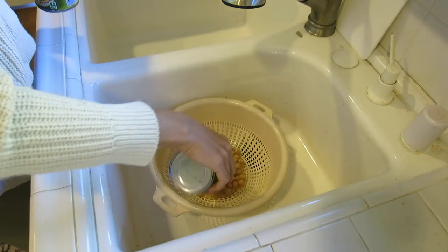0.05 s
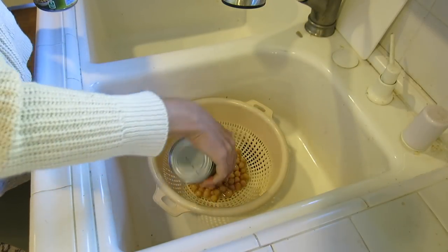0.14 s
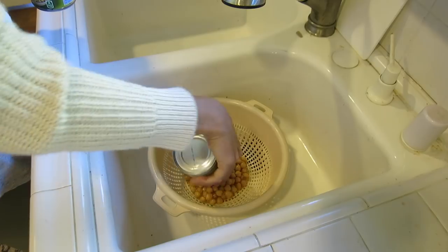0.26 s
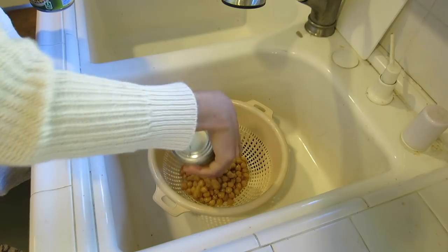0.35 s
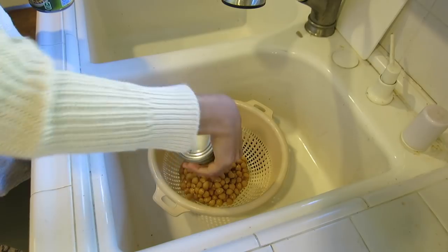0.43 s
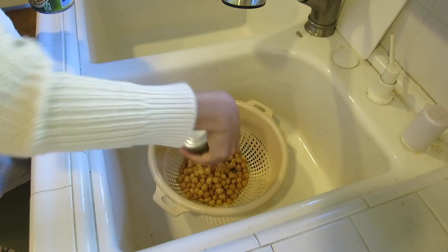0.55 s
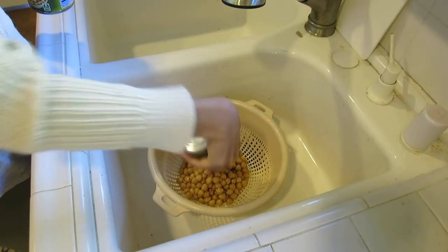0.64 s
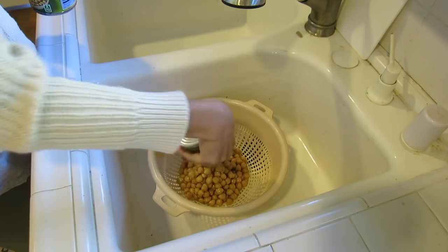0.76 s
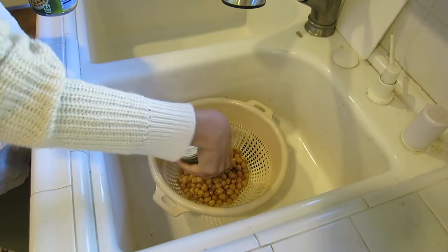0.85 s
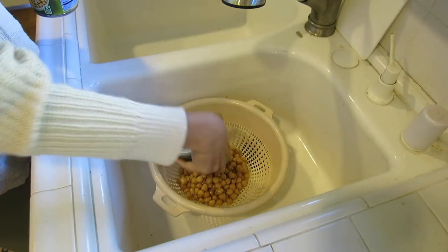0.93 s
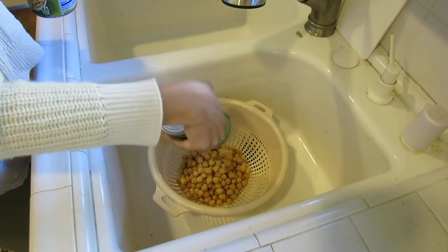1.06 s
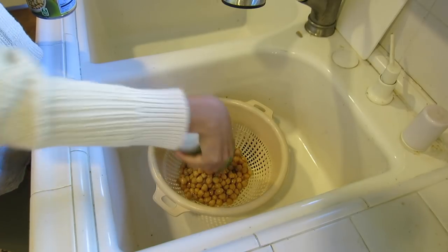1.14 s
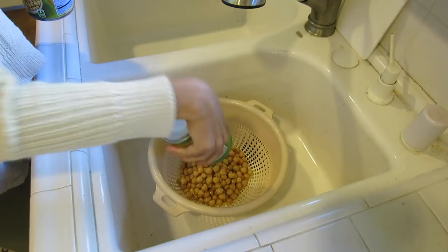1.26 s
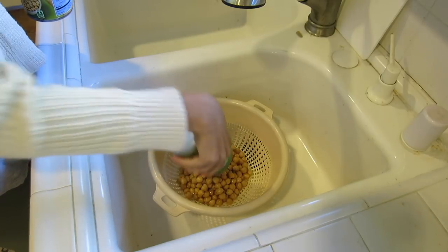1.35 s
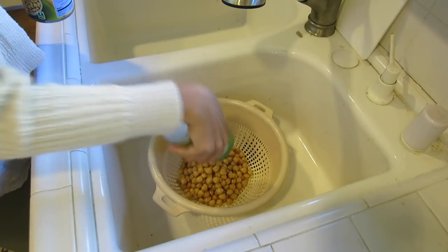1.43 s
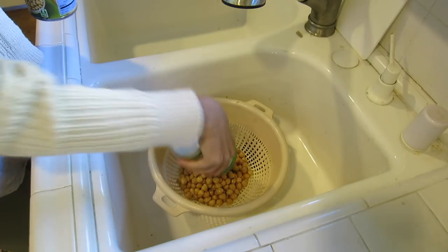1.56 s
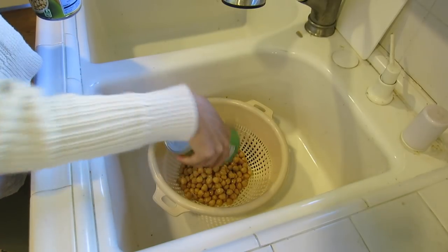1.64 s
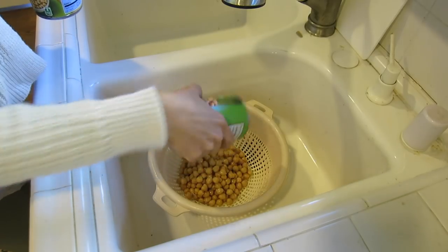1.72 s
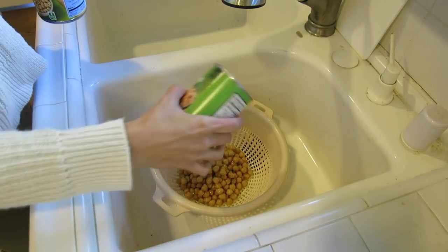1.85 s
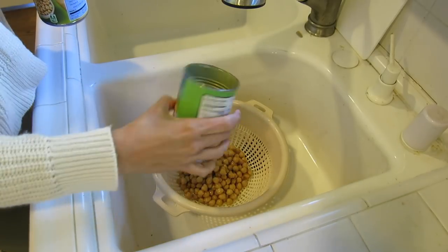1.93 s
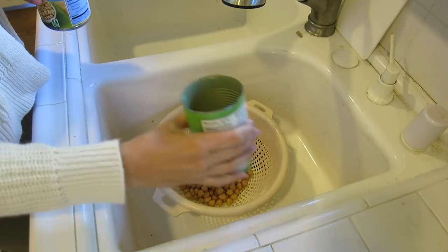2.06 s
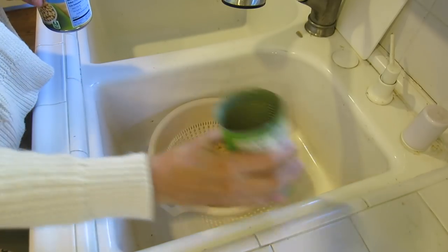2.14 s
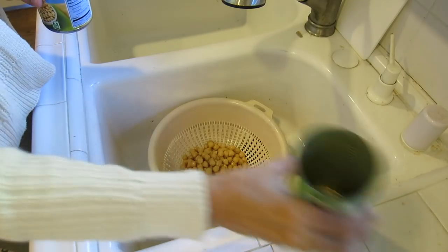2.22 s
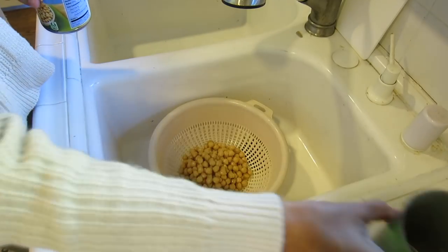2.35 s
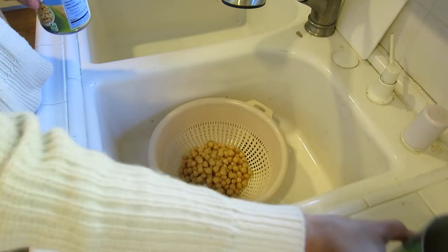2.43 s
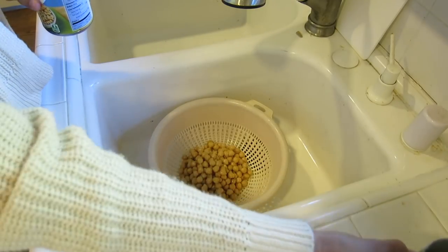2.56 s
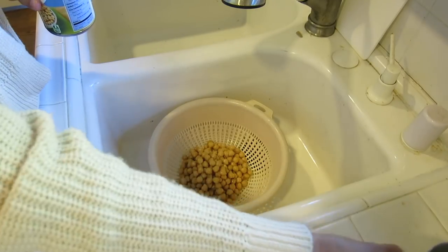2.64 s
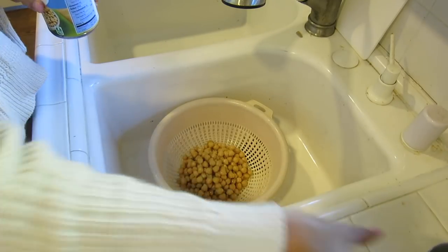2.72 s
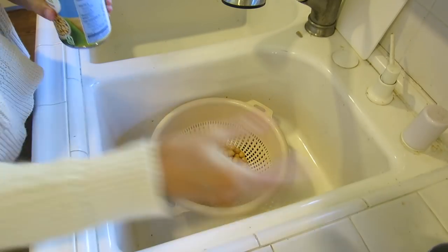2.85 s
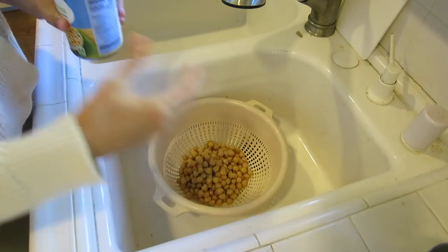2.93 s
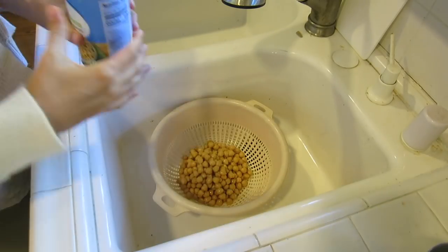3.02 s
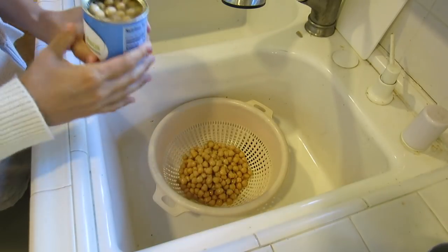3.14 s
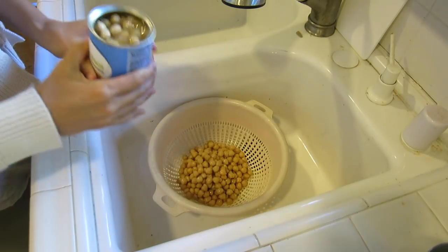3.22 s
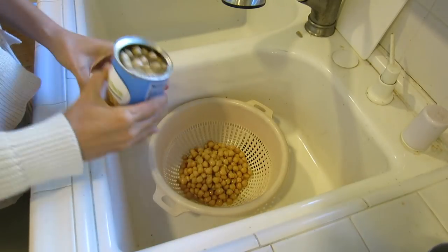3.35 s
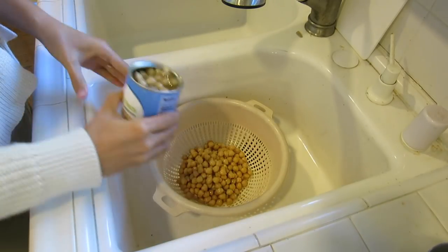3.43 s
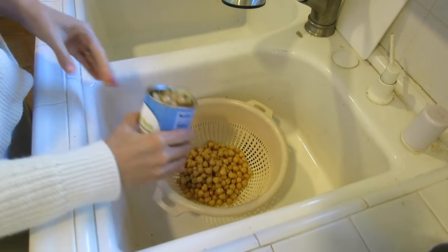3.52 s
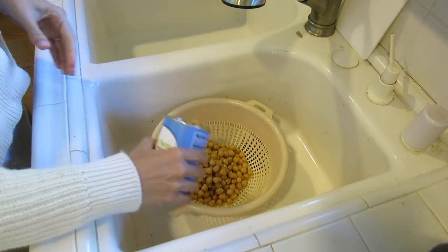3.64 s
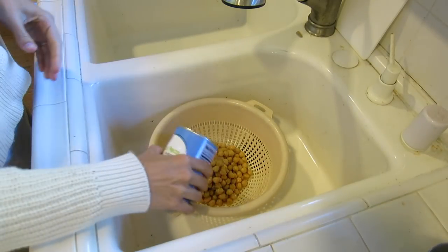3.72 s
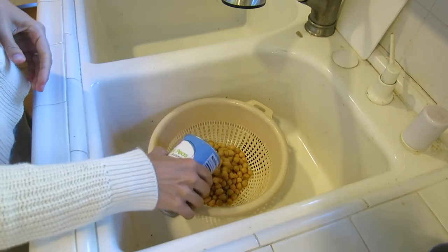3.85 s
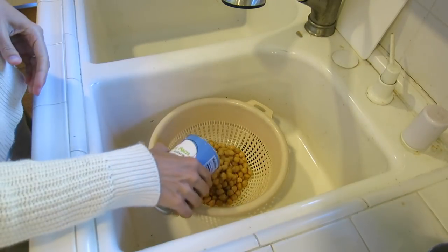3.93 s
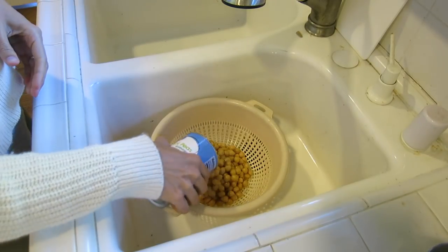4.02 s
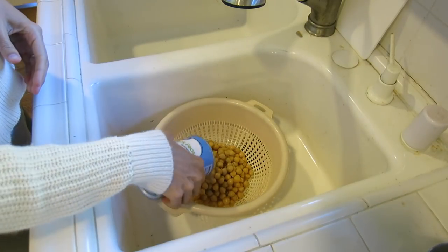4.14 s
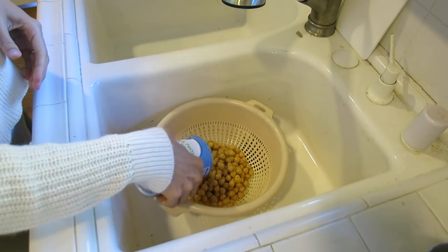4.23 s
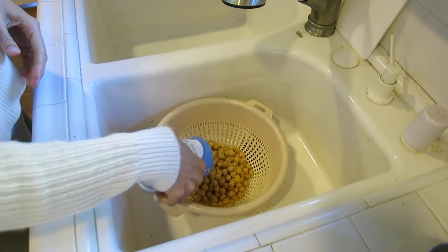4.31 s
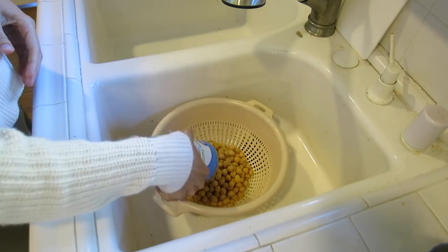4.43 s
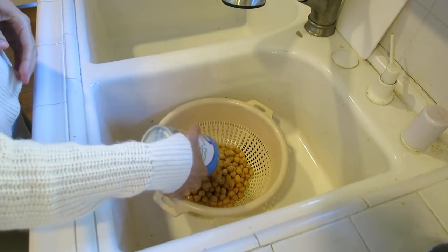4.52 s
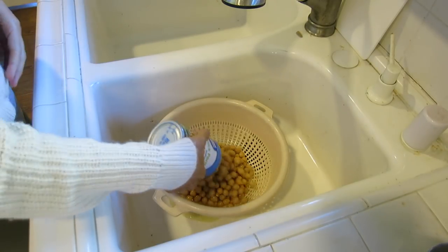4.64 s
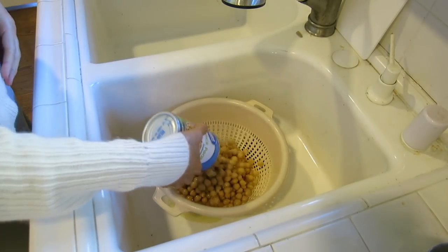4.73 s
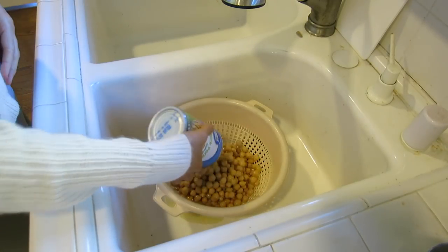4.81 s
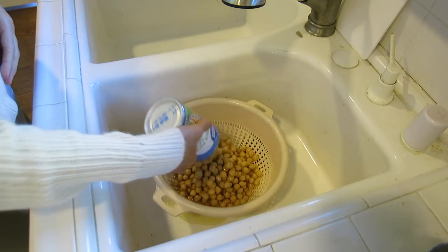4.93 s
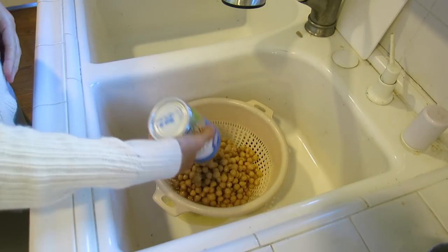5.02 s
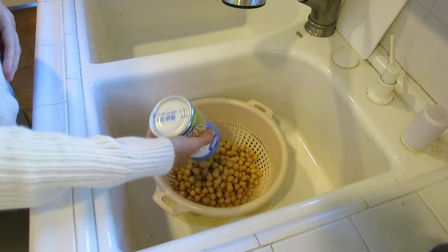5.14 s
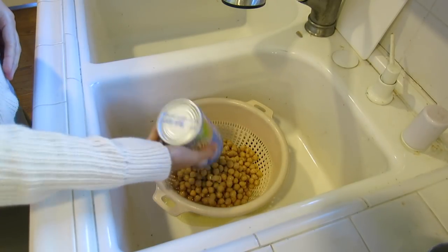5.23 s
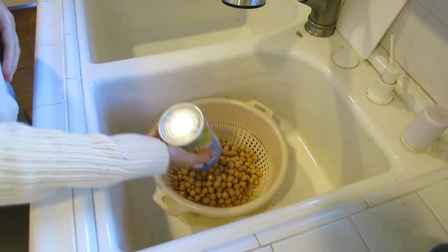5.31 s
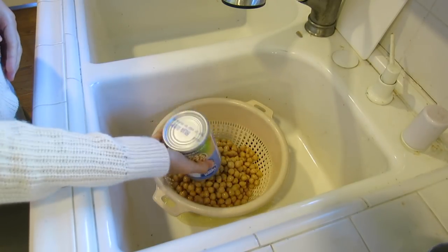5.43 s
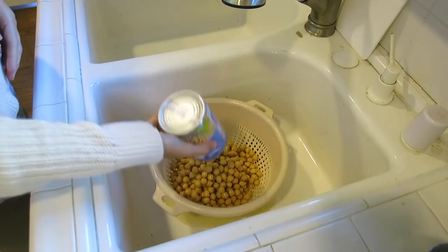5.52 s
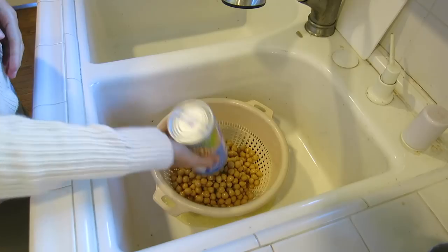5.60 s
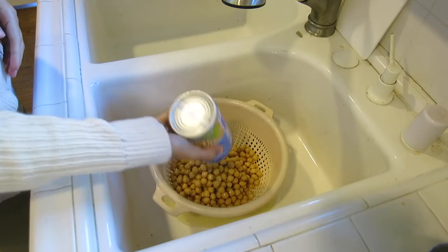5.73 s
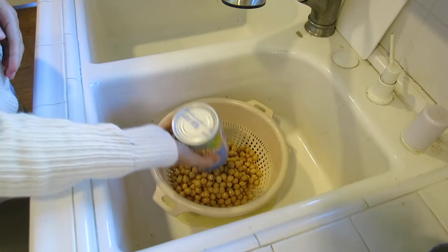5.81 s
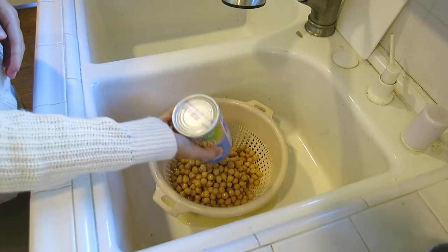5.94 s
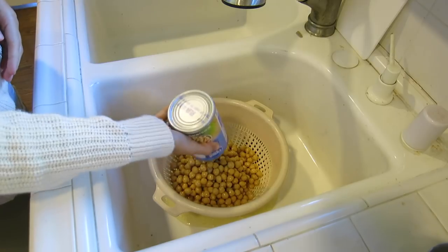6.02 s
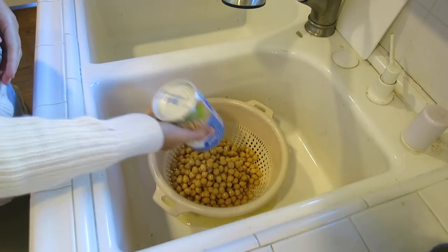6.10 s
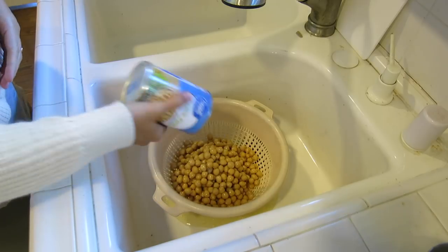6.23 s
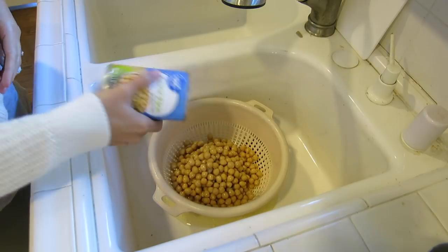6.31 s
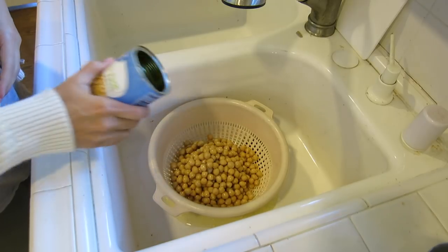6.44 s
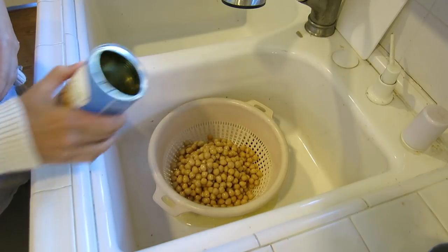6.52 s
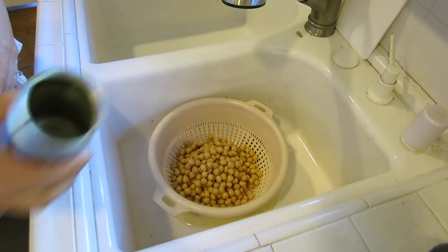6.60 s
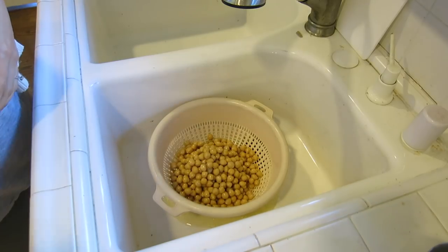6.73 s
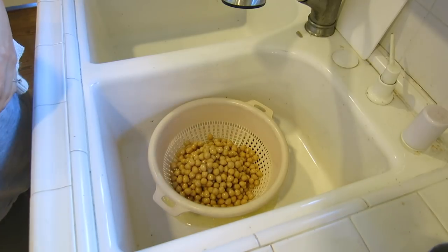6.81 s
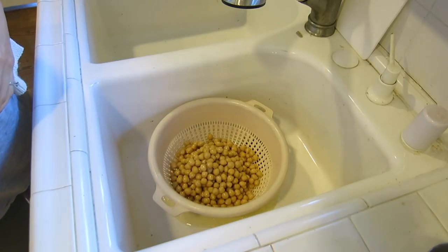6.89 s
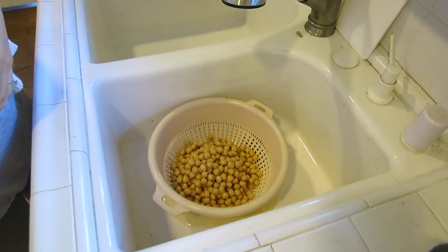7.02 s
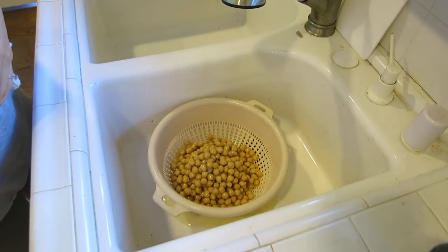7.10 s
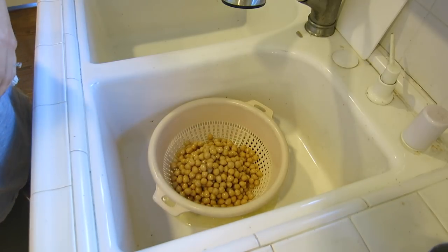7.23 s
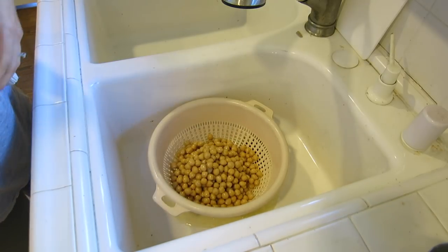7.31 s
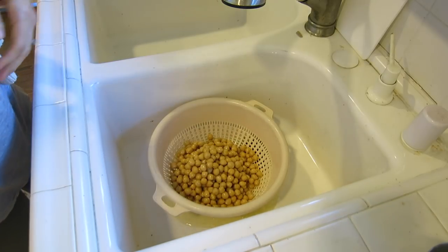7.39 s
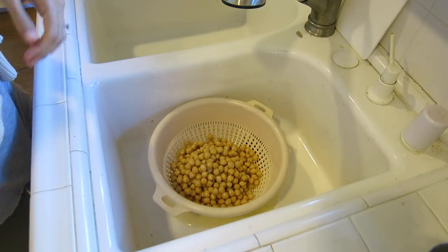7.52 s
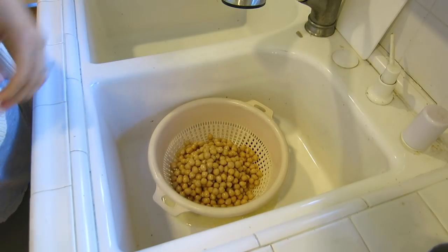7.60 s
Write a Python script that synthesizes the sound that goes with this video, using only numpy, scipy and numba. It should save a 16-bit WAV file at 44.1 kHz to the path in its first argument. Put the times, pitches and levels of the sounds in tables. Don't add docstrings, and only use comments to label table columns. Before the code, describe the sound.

Wet chickpeas slide from two tins into a plastic colander in a sink, brine spattering, and each empty can clanks down on tile.

```python
import sys
import numpy as np
from scipy import signal
from scipy.fft import rfft, irfft, next_fast_len
from scipy.io import wavfile
from scipy.ndimage import uniform_filter1d
from numba import njit

SR = 44100
rng = np.random.default_rng(int(sys.argv[2]) if len(sys.argv) > 2 else 0)


def to_wav(s):
    ch = np.atleast_2d(s).T
    pcm = np.round(np.clip(ch, -1, 1) * 32767)
    wavfile.write(sys.argv[1], SR, pcm.astype(np.int16))


def natural_amplitude(level_db):
    exponent = np.asarray(level_db, float) / 20
    return 10 ** exponent


N = 337806
TIME = np.arange(N) / SR


def level(x, db):
    return x * natural_amplitude(db) / np.sqrt(np.mean(x ** 2))


def colour(x, table):
    table = np.asarray(table)
    size = next_fast_len(x.shape[-1] + 4096)
    log_hz = np.log(np.maximum(np.arange(size // 2 + 1) * SR / size, 1))
    gain = 10 ** (np.interp(log_hz, np.log(table[:, 0].real), table[:, 1]) / 20)
    return irfft(rfft(x, size) * gain, size)[..., :x.shape[-1]]


def walk(rate_hz):
    k = int(SR / rate_hz)
    held = np.repeat(rng.standard_normal(N // k + 1), k)
    return 1.3 * uniform_filter1d(uniform_filter1d(held, k), k)[:N]


@njit
def rings(start_s, size, hz, t60_s, glide, rise_cycles):
    out = np.zeros(N)
    for k in range(len(start_s)):
        first = int(start_s[k] * SR)
        z = size[k] + 0j
        p = np.exp((2j * np.pi * hz[k] - np.log(1000) / t60_s[k]) / SR)
        turn = np.exp(2j * np.pi * hz[k] * glide / (t60_s[k] * SR * SR))
        closed, opening = 1., np.exp(-hz[k] / (rise_cycles * SR))
        for i in range(first, min(N, first + int(t60_s[k] * SR))):
            z, p, closed = z * p, p * turn, closed * opening
            out[i] += z.imag * (1 - closed) ** 2
    return out


def bubbles(s, db, hz, cycles, glide, rise=0.19):
    hz = np.minimum(hz, .4 * SR)
    t60_s = 3 * np.maximum(cycles, .5) / hz
    return rings(1. * s, natural_amplitude(db), hz, t60_s, glide, max(rise, .05))


def shower(db, count, scatter_db, low_hz, high_hz, cycles):
    when, pitch, big = rng.random((count, 3)).T
    size_db = -scatter_db * np.log(np.maximum(big, .02))
    hz = low_hz * (high_hz / low_hz) ** pitch
    grains = bubbles(when * TIME[-1], size_db, hz, cycles + 0 * when, glide=0.32)
    return level(grains, 0) * natural_amplitude(db)


def swells(s, db, hold_s, rise_db_s, fall_db_s):
    t = TIME[::64]
    s, db, hold_s = np.array([s, db, hold_s])[:, :, None]
    rise_db = rise_db_s * np.maximum(s - t, 0)
    fall_db = fall_db_s * np.maximum(t - s - hold_s, 0)
    power = np.sum(natural_amplitude(2 * (db - rise_db - fall_db)), axis=0)
    return np.interp(TIME, t, 10 * np.log10(power + 1e-15))


# [peak_s, peas_db, brine_db]
POUR_SURGES = [(0, -47.5, -39), (0.135, -49, -40.5), (0.401, -45.5, -46.5), (.47, -52.5, -55.5),
               (0.801, -47, -58), (.97, -52, -56.5), (3.36, -67.5, -55), (3.82, -76, -52.5),
               (3.97, -54.5, -46.5), (4.1, -57, -41.5), (4.2, -42, -41.5), (4.38, -49, -43),
               (4.545, -37, -45), (4.741, -33.5, -39.5), (4.87, -33.5, -72), (5.014, -33.5, -44.5),
               (5.18, -38.5, -54.5), (5.36, -42, -49.5), (5.6, -48.5, -83), (5.75, -71, -67)]


def pour(axis, rise_db_s, fall_db_s):
    rows = np.array(POUR_SURGES)
    s = [*rows[:, 0], 9.2]
    db = [*rows[:, axis], -70]
    hold_s = [*(0 * rows[:, 0]), .8]
    return swells(s, db, hold_s, rise_db_s, fall_db_s)


# [start_s, peak_db, pitch_hz, decay_cycles]
PEA_KNOCKS = [(0.094, -12, 2140, 4.9), (0.125, -15, 1900, 1.4), (1.033, -31, 533, 2.2),
              (1.502, -16.5, 920, 0.59), (1.834, -15.5, 830, 0.45), (2.547, -21, 650, 0.9),
              (3.129, -20, 784, 0.6), (3.849, -27, 740, 2.1), (4.024, -25.5, 1220, 5),
              (4.066, -17, 1630, 1.7), (4.182, -13, 980, 2.6), (4.314, -13, 1280, 1.05),
              (4.457, -16.5, 610, 1.1), (4.505, -11.5, 1200, 1.55), (4.571, -15, 475, 2.8),
              (4.605, -23.5, 442, 4.3), (4.689, -10.5, 440, 2.3), (4.757, 6.5, 1090, 0.91),
              (4.817, 1.5, 940, 0.75), (4.844, 3, 850, 0.51), (4.891, -1.5, 1210, 1.97),
              (4.691, -0.5, 990, 1.02), (4.973, -18.5, 604, 4.6), (5.157, -19.5, 568.5, 5.57),
              (5.19, -20, 590, 7.6), (5.35, -1.5, 749, 0.93), (5.538, -20.5, 1659, 3.7),
              (5.634, -13.5, 1590, 2.5), (5.54, -27, 2300, 3), (5.636, -25, 2200, 7)]
# [freq_hz, level_db_per_hz]
PEA_COLOUR = [(88, -45), (150, -5.5), (270, -9), (1170, -3.5), (3520, -18), (5000, -25), (6500, -55),
              (11000, -120)]


def peas():
    s, db, hz, cycles = np.transpose(PEA_KNOCKS)
    knocks = bubbles(s, db - 6.0, hz, cycles, glide=0.14)
    knocks += bubbles(s, db - 22.0, 1.79 * hz, 0 * s + 1.7, glide=0.)
    flow_db = pour(axis=1, rise_db_s=136, fall_db_s=147) - 5
    tumble = shower(flow_db, count=5000, scatter_db=0.5, low_hz=238, high_hz=4070, cycles=4.2)
    return knocks + level(colour(tumble, PEA_COLOUR), 0) * np.std(tumble)


# [start_s, peak_db, pitch_hz]
RINGING_DROPS = [(.168, -10.5, 6340), (0.818, -39.5, 1400), (0.894, -30, 4860), (2.6196, -14, 7070),
                 (3.474, -29, 9500), (3.612, -25.5, 10000), (3.6415, -31.5, 7300), (4.0649, -34, 4500),
                 (4.103, -16, 9330), (4.869, -30.5, 4950), (5.239, -27.5, 9000), (5.438, -30, 8810),
                 (5.5468, -31.5, 6900), (5.741, -31, 6450), (5.886, -30, 7030), (5.94, -31, 9200),
                 (5.994, -31, 6880), (6.03, -39, 10000), (6.104, -33, 9300), (6.501, -30, 7120),
                 (6.787, -42.5, 6300), (7.0547, -27, 10060), (7.072, -29, 11200), (7.285, -29, 10000),
                 (7.126, -31, 7000), (7.2712, -30.5, 6100)]
BLIP_DROPS = [(1.0136, -27.5, 11800), (1.8454, -32, 8130), (3.8248, -26, 9300), (3.8363, -19.5, 8900),
              (3.913, -14.5, 7460), (3.9726, -26.5, 6600), (3.9878, -21.5, 8600), (4.207, -26, 5160),
              (4.2296, -24, 6170), (4.3106, -16.5, 5760), (4.438, -30, 5230), (4.648, -20.5, 9000),
              (4.848, -23.5, 2350), (4.911, -25, 9300), (5.005, -26, 7100), (5.0406, -15, 8200),
              (5.2998, -20, 10100), (5.339, -25.5, 8400), (5.484, -31, 10460), (5.681, -28, 6600),
              (6.088, -27, 8400), (6.217, -29.5, 6700), (6.308, -31, 8300), (6.351, -28.5, 9800),
              (6.3814, -25, 9300), (6.488, -20, 9000), (6.611, -29.5, 9300), (6.9734, -36, 9500),
              (7.0963, -24, 10700)]
TICK_DROPS = [(0.049, -11, 5240), (.0488, -9.5, 11500), (0.295, -21.5, 10800), (0.4738, -17, 11800),
              (0.7758, -8.5, 9200), (2.25, -25.5, 12300), (2.653, -12.5, 5600), (3.1274, -29, 11800),
              (3.3755, -13, 10800), (3.7388, -19, 10100), (4.029, -18, 10300), (4.076, -13, 10900),
              (4.4036, -22, 9810), (4.635, -21, 9700), (4.732, -18, 8940), (5.8318, -26, 7800),
              (5.839, -24, 7500), (6.0556, -25.5, 8400), (6.578, -26, 8900), (6.766, -26, 7900),
              (6.14, -34, 9000), (6.281, -33, 7240), (6.841, -31, 7200), (4.24, -17.5, 9600),
              (3.859, -18.5, 11000), (7.255, -23.5, 10600)]
SPLAT_DROPS = [(.008, -8, 2040), (0.0934, -11.5, 5840), (0.1145, -23, 9000), (0.259, -17, 5840),
               (0.4085, -13, 9040), (0.459, -21, 3500), (.7748, -20, 12200), (.80, -30, 7000),
               (.825, -30, 6500), (0.893, -20, 11300), (1.2061, -34, 9040), (1.972, -30, 10500),
               (2.0492, -36, 9050), (2.1738, -28, 10200), (3.7872, -18, 7300), (4.239, -27, 2450),
               (4.697, -18, 9350), (4.8928, -30, 2373), (5.742, -25, 10900), (5.845, -27.5, 12500),
               (6.161, -30.5, 13000), (6.47, -28, 11600), (6.8604, -29.5, 9900)]
# [decay_cycles, slap_re_peak_db]
DROP_CHARACTER = [
    (20.9, -23),
    (7.3, -6),
    (3.06, -0.5),
    (1.78, 5),
]
# [freq_hz, gain_db]
SLAP_COLOUR = [(2500, -16), (5000, -1), (12500, 2)]
# [freq_hz, level_db_per_hz]
BRINE_COLOUR = [(1180, 14), (2000, 3.5), (3200, -10.5), (5630, -1), (10100, 3.5), (16000, 4)]
# [freq_hz, level_re_drop_db, t60_s]
COLANDER_MODES = [(3320, -43, .05), (5310, -37, .04), (7100, -24, .025), (11600, -22, .02)]


def brine():
    kinds = zip((RINGING_DROPS, BLIP_DROPS, TICK_DROPS, SPLAT_DROPS), DROP_CHARACTER)
    rows = [(*drop, *kind) for drops, kind in kinds for drop in drops]
    s, db, hz, cycles, slap_db = np.transpose(rows)
    slaps = sum(bubbles(s, db + slap_db, 0 * s + edge_hz, 0 * s + 1, glide=0.) for edge_hz in (7500, 13000))
    drops = bubbles(s, db, hz, cycles, glide=0.04, rise=0.34) + colour(slaps, SLAP_COLOUR)
    a, b = rng.standard_normal((len(s), 2)).T
    drained = s > 5.7
    for (mode_hz, mode_db, t60_s), spot, shift in zip(COLANDER_MODES, [a, b, -a, -b], [b, a, -b, -a]):
        size = natural_amplitude(db + mode_db + 5.3 * spot) * drained
        drops += rings(s, size, mode_hz * (1 + .03 * shift), t60_s + 0 * s, 0., 1.)
    for late, pitch, small in rng.random((len(s), 2, 3)).transpose(1, 2, 0):
        back_s, back_db = s + .002 + 0.012 * late, db - 10.0 - 9 * small
        drops += bubbles(back_s, back_db, hz * 1.5 ** (pitch - .4), 1.3 * cycles, glide=0.12, rise=0.55)
    flow_db = pour(axis=2, rise_db_s=116, fall_db_s=105) - 3.0
    stream = shower(flow_db, count=30000, scatter_db=7.5, low_hz=2200, high_hz=15040, cycles=5.2)
    seep_db = -82 + 6 * (TIME > 3) + 2 * walk(4)
    seep = duck() * shower(seep_db, count=700, scatter_db=4.5, low_hz=5500, high_hz=14000, cycles=3.0)
    return drops + level(colour(stream, BRINE_COLOUR), 0) * np.std(stream) + seep


# [start_s, peak_db, pitch_hz]
SMALL_SPATTER = [(.02, -24, 11000), (.39, -36, 10500), (.42, -37, 8800), (.3641, -46, 10560),
                 (3.26, -38.5, 6730), (1.1477, -45, 11150), (1.912, -43, 10700), (.7352, -52, 10600),
                 (4.286, -38, 2980), (4.46, -35, 2050), (.5931, -42, 9000), (0.6387, -40, 7830),
                 (4.4495, -36.5, 3840), (3.403, -31, 11100), (3.7541, -28, 9750), (3.7696, -31, 6400),
                 (3.8444, -29, 8340), (4.0014, -25, 11300), (4.0897, -24, 10200), (4.151, -29, 10600),
                 (4.1674, -28.5, 6350), (4.2867, -35, 6250), (4.3577, -32, 5400), (4.4144, -31, 8400),
                 (4.4643, -29.5, 5400), (4.4787, -33, 5340), (4.5116, -28, 11100), (4.5344, -34, 9900),
                 (4.564, -40, 6900), (4.581, -35.5, 4900), (4.705, -26, 10300), (4.7115, -32, 5610),
                 (4.7541, -33, 4860), (4.791, -32, 6900), (4.8147, -48, 4326), (4.8844, -40, 10040),
                 (4.943, -36, 10000), (5.0794, -41, 8080), (5.1257, -34, 12500), (5.3894, -39, 6130),
                 (5.4594, -49, 10660), (5.4997, -37, 10530), (5.6994, -38, 8970), (5.7414, -38, 6400),
                 (5.8022, -37, 12250), (6.34, -47, 9630)]
# [start_s, peak_db, pitch_hz]
AIR_GULPS = [(0.059, -45, 261), (0.198, -42, 336), (0.279, -47, 258), (0.36, -43, 268), (0.439, -34, 278),
             (0.53, -45, 347), (0.583, -32.5, 600), (0.629, -32.5, 270), (0.659, -31, 668),
             (0.75, -43, 293), (0.819, -32, 540), (0.87, -38, 490), (0.959, -39, 522), (1.1, -51, 396.6),
             (1.21, -34, 643), (1.305, -40, 450), (2.329, -37, 520), (4.529, -24, 587), (4.627, -37, 533),
             (5.118, -32, 533), (5.239, -36, 610), (5.469, -45, 604), (5.536, -29.5, 613),
             (5.579, -42, 624), (5.632, -22.5, 880), (5.669, -41, 312), (5.718, -46, 338)]
# [start_s, peak_db, pitch_hz]
RISING_PLIPS = [(0.182, -31.5, 2470), (0.226, -39, 1700), (0.2577, -33, 3260), (0.3762, -45.5, 1240),
                (0.4197, -41, 1320), (0.5274, -57, 1270), (0.5836, -49, 2000), (0.624, -50, 1520),
                (0.6494, -48, 2150), (0.7474, -52, 1560), (0.8001, -40, 2040), (0.821, -55, 1350),
                (3.787, -40, 2740), (3.8934, -50, 1710), (3.9918, -43, 2680), (4.0443, -38, 1640),
                (4.1395, -39, 2380), (4.1936, -26, 1730), (4.2114, -49, 1950), (4.239, -40, 1660),
                (4.284, -40, 1270), (4.403, -44, 1290), (4.6349, -37, 2970), (4.7294, -27, 1570),
                (4.742, -26, 1260), (4.7914, -30, 1320), (5.002, -25.5, 1910), (5.04, -33, 1470),
                (5.2084, -57, 1285), (5.837, -41.5, 1700)]


def plips():
    s, db, hz = np.transpose(SMALL_SPATTER)
    small = bubbles(s, db + 4, hz, 8 + 0 * s, glide=.04, rise=0.52)
    small += sum(bubbles(s, db + 2, 0 * s + edge_hz, 0 * s + 1, glide=0.) for edge_hz in (4500, 13000))
    s, db, hz = np.transpose(AIR_GULPS)
    gulps = bubbles(s, db - 1, hz, 4.8 + 0 * s, glide=0.054, rise=0.53)
    s, db, hz = np.transpose(RISING_PLIPS)
    return small + gulps + bubbles(s, db + 5, hz, 5.1 + 0 * s, glide=0.14, rise=0.3)


# [time_s, pitch_hz, unevenness_ratio]
AIR_COLUMN = [(.33, 702, 1.1), (0.621, 635, 1.09), (.72, 645, 0.91), (.79, 520.3, 0.93), (1.1, 515, 0.8),
              (4.68, 477, 0.73), (4.959, 565, 0.28), (5.2, 588, 0.19), (5.42, 617, 0.29)]
# [start_s, level_db, hold_s]
HUM_SWELLS = [(0.418, -52, 0.059), (0.595, -49, 0.067), (0.83, -53, 0.057), (0.943, -41.5, 0.026),
              (1.049, -46, 0.011), (4.77, -33, .02), (4.923, -35.5, .005), (4.967, -30.5, 0.14),
              (5.158, -33, .005), (5.195, -24, 0.018), (5.246, -43, 0.024), (5.363, -25.5, 0.025),
              (5.419, -51, 0.0067)]


def hollow():
    s, hz, uneven = np.transpose(AIR_COLUMN)
    uneven = np.interp(TIME, s, uneven)
    hz = np.interp(TIME, s, hz) * (1 + .09 * uneven * walk(70))
    flutter_db = 6 * uneven * (walk(60) - .5)
    hum_db = swells(*np.transpose(HUM_SWELLS), rise_db_s=457, fall_db_s=598)
    return np.sqrt(2) * natural_amplitude(hum_db + flutter_db) * np.sin(2 * np.pi * np.cumsum(hz) / SR)


def can(hits, modes, crack, strike, ring_db, crack_db, buzz_db, buzz_t60_s, beat_hz, wobble_db):
    hz, db, t60_s = np.tile(np.transpose(modes), 2)
    ring, blow, buzz = np.zeros((3, N))
    hz = hz - beat_hz * np.repeat([0, 1], len(modes))
    db = db + np.repeat([0, -6], len(modes))
    blow_hz, blow_db, blow_t60_s = np.transpose(strike)
    for s, peak_db in hits:
        sign = np.sign(np.tile(rng.uniform(-1.2, 1, len(modes)), 2))
        ring += rings(s + 0 * hz, natural_amplitude(peak_db + db + ring_db) * sign, hz, np.minimum(t60_s, 1), 0., 0.093)
        blow_size = natural_amplitude(peak_db + blow_db + crack_db)
        blow += rings(s + 0 * blow_hz, blow_size, 1. * blow_hz, 1. * blow_t60_s, 0., 0.42)
        decay_db = -60 * np.maximum(TIME - s, 0) / buzz_t60_s
        buzz += natural_amplitude(peak_db + buzz_db + decay_db) * (TIME >= s)
    wobble = natural_amplitude(wobble_db * walk(70))
    return blow + wobble * (ring + buzz * level(colour(rng.standard_normal(N), crack), 0))


# [start_s, peak_db]
FIRST_HITS = [
    (2.619, -3),
    (2.644, -20),
    (2.654, -13.5),
    (2.744, -39.5),
]
# [freq_hz, level_db, t60_s]
FIRST_WALL = [(494, 2, 0.24), (577, -2, 0.13), (659, -3.5, 0.19), (970, -16, 0.55), (1110, -25.5, 0.4),
              (1400, -7, 0.29), (1278, -7.5, 0.31), (2260, -23.5, 0.68), (544, -3, 0.25),
              (2870, -17.5, 0.26), (4500, -16.5, 0.22), (5324, -26, 0.45), (5550, -27, 0.35),
              (6640, -30.5, .08)]
# [freq_hz, level_db_per_hz]
FIRST_BUZZ = [(350, -20), (500, 10.5), (800, 0.5), (1350, 4.5), (2700, -2.5), (3300, -56), (5500, -11),
              (7500, -25.5), (12000, -13), (16000, -40.5)]
# [freq_hz, level_db, t60_s]
FIRST_STRIKE = [(504, -13.5, 0.019), (1160, 0.5, 0.0088), (1400, -16, 0.012), (2200, -3, 0.0091),
                (2400, -26, 0.0065), (4500, -29.5, 0.0039), (5400, -15, 0.015), (8800, -9.5, 0.0053),
                (11800, -3, 0.0035), (13900, -10.5, 0.0033)]


def first_can():
    return can(FIRST_HITS, FIRST_WALL, FIRST_BUZZ, FIRST_STRIKE, ring_db=-18.0, crack_db=3.5,
               buzz_db=-23.0, buzz_t60_s=0.28, beat_hz=8.3, wobble_db=2.0)


# [start_s, peak_db]
SECOND_HITS = [
    (7.363, 2.5),
    (7.385, -39),
    (7.497, -23),
    (7.513, -21.5),
]
# [freq_hz, level_db, t60_s]
SECOND_WALL = [(629, -5, 1.0), (696, -10, 0.5), (910, -21, 0.3), (1031, -14, 0.3), (1091, -9, 0.45),
               (1942, -11, 0.5), (2110, -18, 0.5), (2170, -5, 0.4), (2288, -19, 0.3), (2365, -14, 0.3),
               (3760, -21, 0.3), (5642, -14, 0.3), (6627, -18, 0.25), (8385, -25, 0.4)]
# [freq_hz, level_db_per_hz]
SECOND_BUZZ = [(420, -21.5), (640, 7), (800, -7.5), (1000, -3), (1300, -16.5), (1600, -20), (2200, 0.5),
               (2420, -28), (2600, -32), (2900, -22.5), (3800, -25.5), (5600, -26), (6150, -40),
               (6650, -18.5), (7400, -45), (8400, -24), (12000, -31), (16000, -48)]
# [freq_hz, level_db, t60_s]
SECOND_STRIKE = [(650, -19, 0.038), (985, -0.5, 0.012), (1750, -11, 0.016), (2300, -7.5, 0.015),
                 (4000, -9, 0.009), (6000, -22, 0.0073), (6600, -9, 0.0037), (8400, -16, 0.01),
                 (10800, -7.5, 0.0054), (11830, 1, 0.0029), (14700, -6, .003)]


def second_can():
    return can(SECOND_HITS, SECOND_WALL, SECOND_BUZZ, SECOND_STRIKE, ring_db=-21.0, crack_db=-1.0,
               buzz_db=-22.5, buzz_t60_s=0.6, beat_hz=8.8, wobble_db=1.0)


# [freq_hz, level_db, t60_s]
TIN_PING = [(4670, -7, 0.18), (5260, -3, 0.1), (6230, 0, 0.073)]
# [start_s, peak_db, mode_hz, t60_s]
TIN_TAPS = [(5.006, -28, 7200, 0.046), (5.05, -45, 4690, 0.1), (5.11, -46, 2300, 0.057),
            (5.175, -47, 2300, 0.16), (5.236, -39, 1900, 0.054), (5.378, -51, 3660, 0.12),
            (4.531, -35.5, 1080, .15)]


def ping():
    hz, db, t60_s = np.transpose(TIN_PING)
    together = rings(5.388 + 0 * hz, natural_amplitude(db - 44), hz, t60_s, 0., 1.)
    s, tap_db, tap_hz, tap_t60_s = np.transpose(TIN_TAPS)
    return together + rings(1. * s, natural_amplitude(tap_db), 1. * tap_hz, 1. * tap_t60_s, 0., 0.93)


# [start_s, level_db, hold_s]
SLEEVE_RUSTLES = [(1.247, -66, 0.026), (1.455, -65, 0.016), (1.654, -61, 0.035), (2.21, -60, 0.018),
                  (2.28, -63.5, 0.041), (2.383, -62.5, 0.015), (3.224, -57.5, 0.2), (.79, -55, 0.029)]
# [freq_hz, level_db_per_hz]
WOOL_COLOUR = [(3500, -25.5), (7000, -10.5), (11500, -2), (15500, -7.5)]


def sleeve():
    hiss = level(colour(rng.standard_normal(N), WOOL_COLOUR), 0)
    puffs_db = swells(*np.transpose(SLEEVE_RUSTLES), rise_db_s=350, fall_db_s=308)
    return hiss * natural_amplitude(puffs_db + 1.4 * walk(60))


# [start_s, drop_db, hold_s]
GAIN_DROPS = [
    (2.604, 13.5, .01),
    (7.352, 13.5, 0.26),
]


def duck():
    rest_db, duck_s, recover_s = 2.5, 0.02, 0.64
    gain_db = rest_db + 0 * TIME
    for s, drop_db, hold_s in GAIN_DROPS:
        onset = np.clip((TIME - s) / duck_s, 0, 1)
        recovery = np.exp(-np.maximum(TIME - s - duck_s - hold_s, 0) / recover_s)
        gain_db -= drop_db * onset * recovery
    return natural_amplitude(gain_db)


# [freq_hz, rms_db]
FRIDGE_LINES = [(91, -63), (120, -48.5), (241, -65)]
# [freq_hz, level_db_per_hz]
AIR_COLOUR = [(15, -55), (25, -24.5), (64, -12), (94, -4.5), (123, -5), (145, -1.5), (185, -13.5),
              (229, -7.5), (301, -17.5), (363, -14), (405, -19.5), (1230, -26.5), (3620, -43.5),
              (11900, -40.5), (16000, -47.5)]
# [freq_hz, side_re_mid_db]
AIR_WIDTH = [(60, -25.5), (110, -20.5), (200, -5.5), (380, 7.5), (700, 11), (1290, 10.5), (2380, 9),
             (4400, -4), (8120, -13), (15000, 2)]


def kitchen():
    mid, side = (colour(rng.standard_normal(N), AIR_COLOUR) for _ in range(2))
    side = colour(side, AIR_WIDTH)
    air = level(np.array([mid + side, mid - side]), -46.5) * natural_amplitude(.6 * walk(8.3))
    drone = np.zeros(N)
    for hz, db in FRIDGE_LINES:
        size = np.sqrt(2) * natural_amplitude(db + 0.87 * walk(17))
        drone += size * np.sin(2 * np.pi * hz * TIME + 1.03 * walk(11))
    return (air + drone) * duck()


# [freq_hz, gain_db]
WALL_COLOUR = [(2500, 1.5), (6500, -4), (9000, -12), (16000, -15)]
# [freq_hz, gain_db]
ECHO_WIDTH = [(60, -39.5), (250, -11), (600, -23), (1500, -10.5), (4500, -32), (9000, -18), (15000, -3)]
# [freq_hz, left_re_right_db, left_lead_rad]
MIC_PORTS = [(99, -3, 0.01), (298, -1, -0.43), (870, -2.5, -0.58), (1900, -3, -0.74), (3540, -1, 0.26),
             (9000, 0, 0.2), (15000, 3, 1)]


def place(x, tail_db, t60_s, late_db, late_t60_s):
    t = np.arange(SR // 2) / SR
    near, far = rng.standard_normal((2, 2, len(t)))
    echoes = near * natural_amplitude(tail_db - 60 * t / t60_s)
    echoes += colour(far, WALL_COLOUR) * natural_amplitude(late_db - 60 * t / late_t60_s)
    mid, side = echoes * np.minimum(t / 0.0012, 1)
    mid[0] = 1
    even = np.sqrt(np.sum(mid ** 2) / uniform_filter1d(np.abs(rfft(mid)) ** 2, size=25))
    kept = SR * 2 // 5
    mid = irfft(rfft(mid) * even, len(t))[:kept] * np.cos(np.linspace(0, np.pi / 2, kept))
    mid = signal.fftconvolve(x, mid)[:N]
    side = colour(signal.fftconvolve(x, side)[:N], ECHO_WIDTH)
    hz, db, lead_rad = np.transpose(MIC_PORTS)
    half = np.transpose([hz, db / 2 + 10j * lead_rad / np.log(10)])
    return np.array([colour(mid, half) + side, colour(mid, half * [1, -1]) - side])


def scene():
    soft = place(peas(), tail_db=-15.5, t60_s=0.055, late_db=-38.5, late_t60_s=0.6)
    wet = place(brine() + plips() + sleeve(), tail_db=-17.5, t60_s=0.035, late_db=-37.5, late_t60_s=0.44)
    tin = hollow() + first_can() + second_can() + ping()
    tile = place(tin, tail_db=-24.5, t60_s=0.029, late_db=-46.0, late_t60_s=0.79)
    return colour(soft + wet + tile, [(60, -53), (200, 0.5), (400, -1.5)]) + kitchen()


def band_limit(x):
    return signal.sosfilt(signal.butter(12, 15950, fs=SR, output="sos"), x)


def record(dry):
    dulled = colour(dry, [(15000, 0), (16600, -14)])
    return band_limit(np.clip(dulled, -1, 1))


dry = scene()
out = record(dry)
to_wav(out)
```